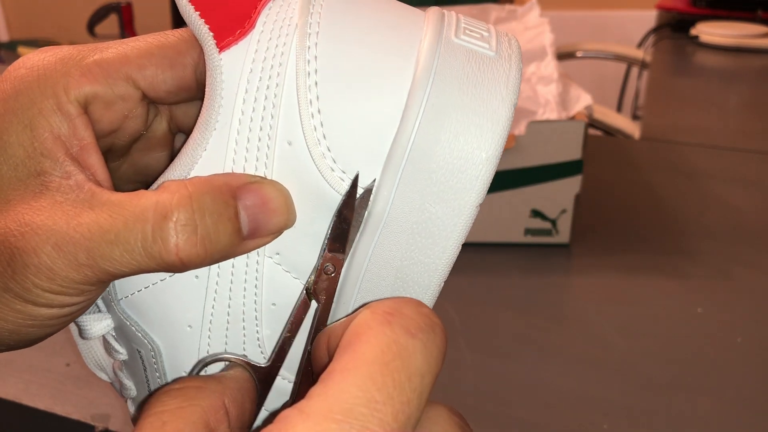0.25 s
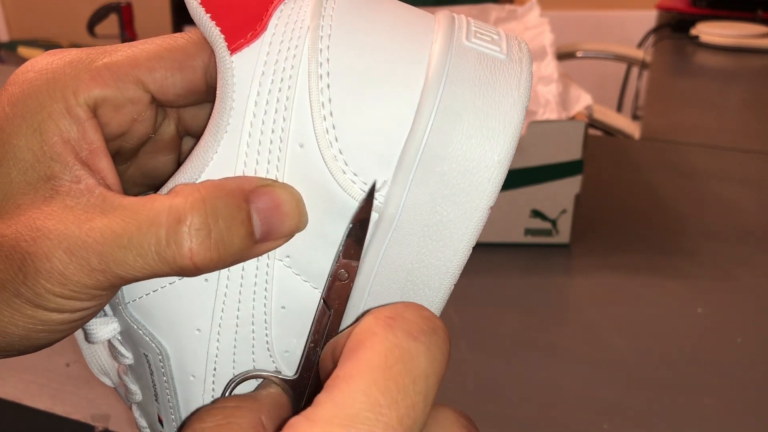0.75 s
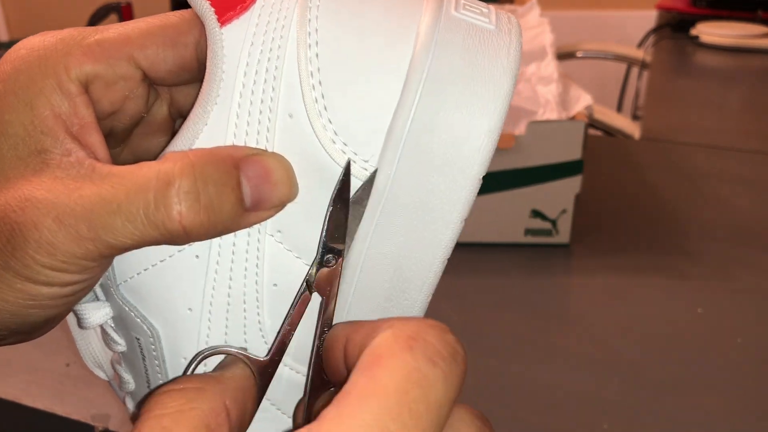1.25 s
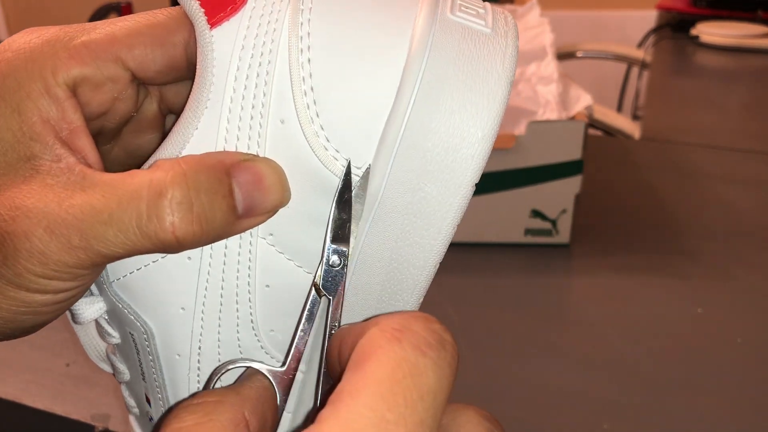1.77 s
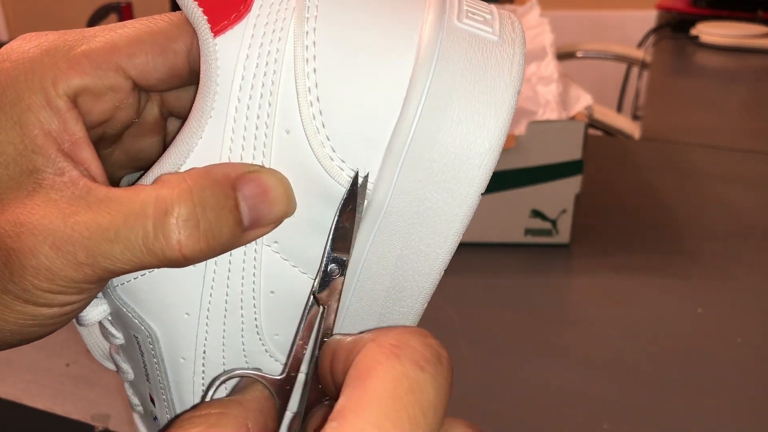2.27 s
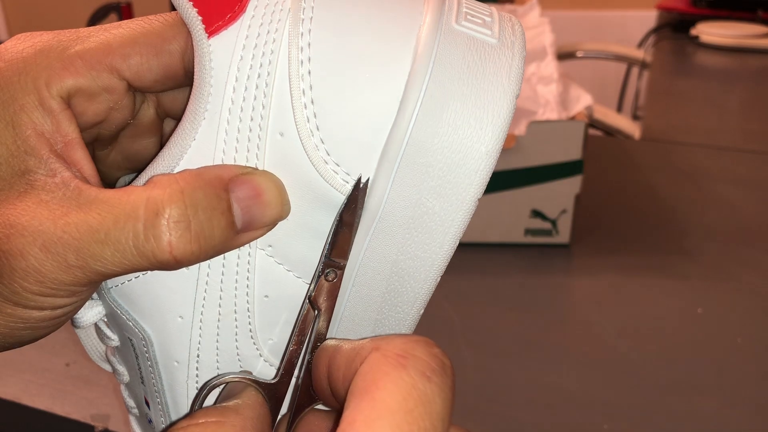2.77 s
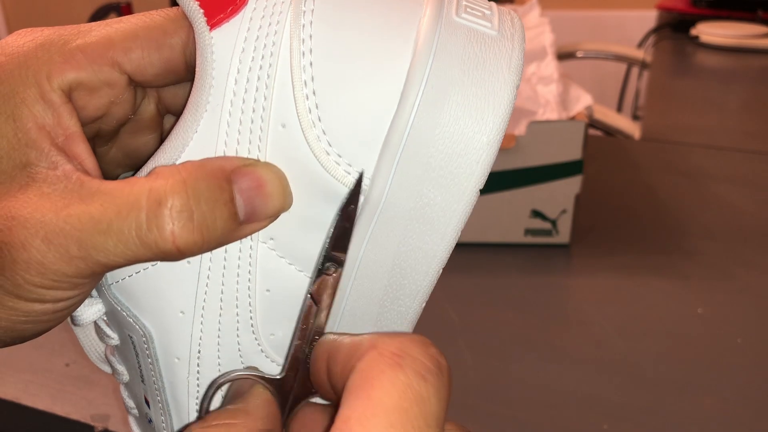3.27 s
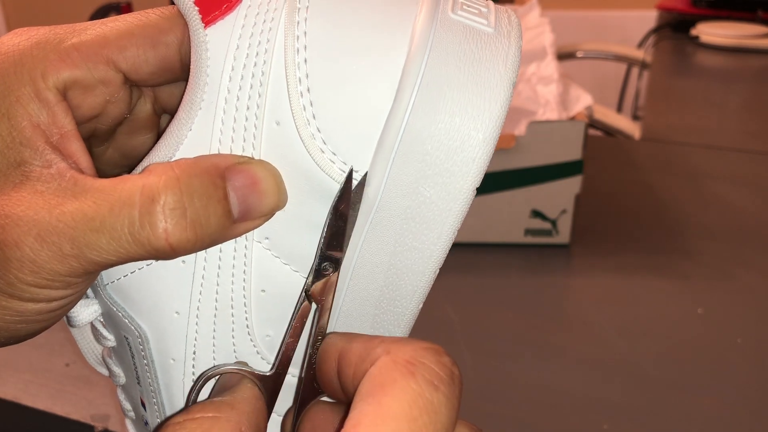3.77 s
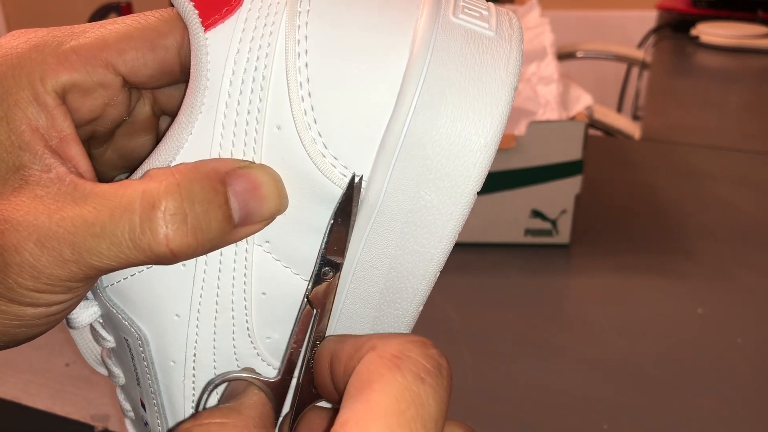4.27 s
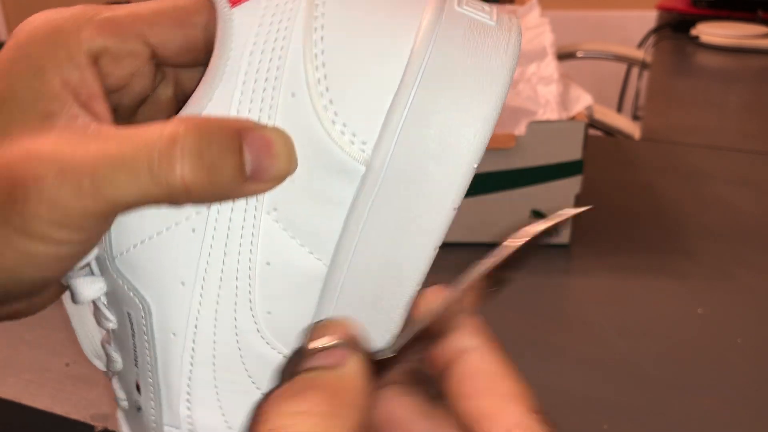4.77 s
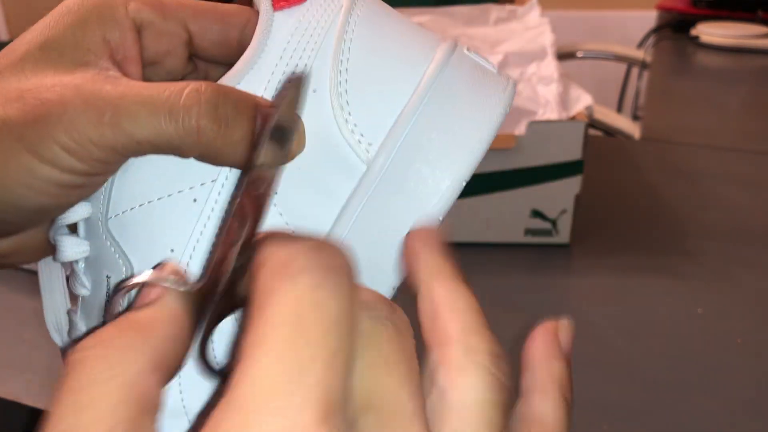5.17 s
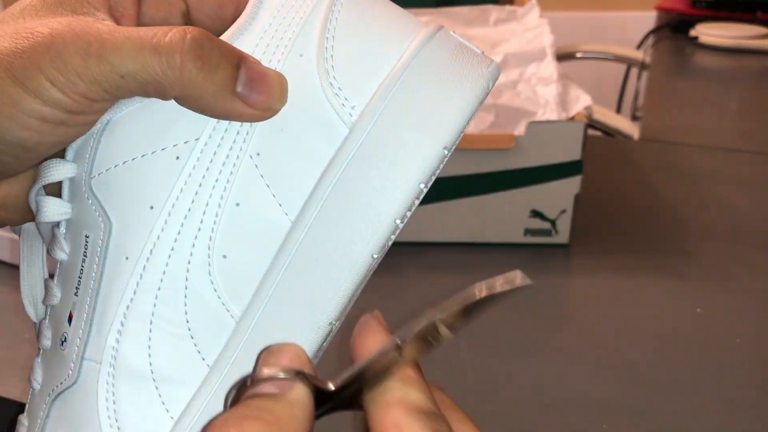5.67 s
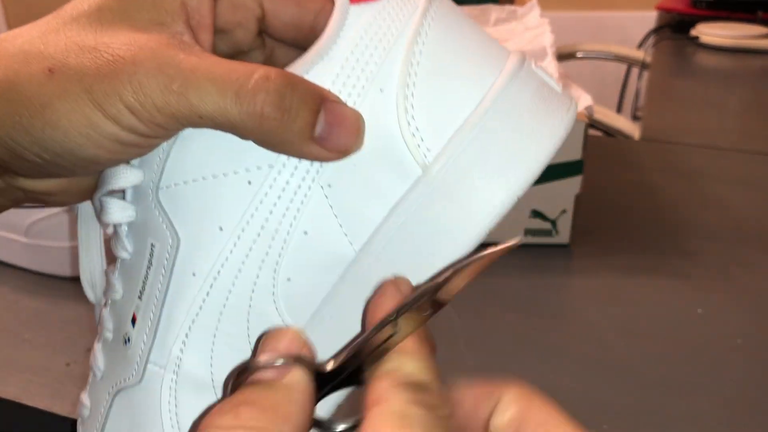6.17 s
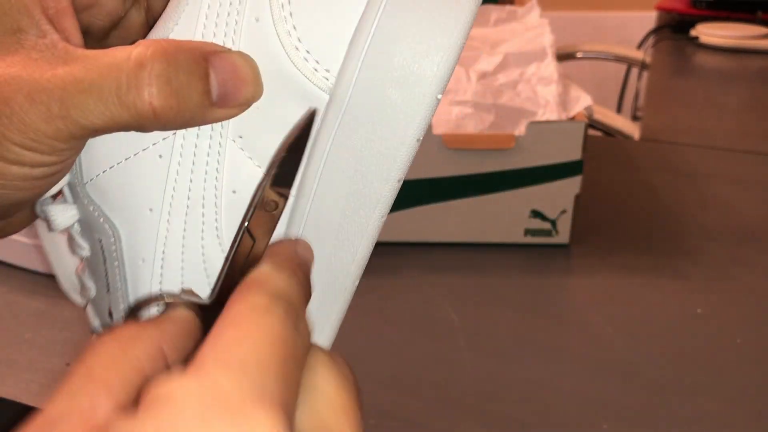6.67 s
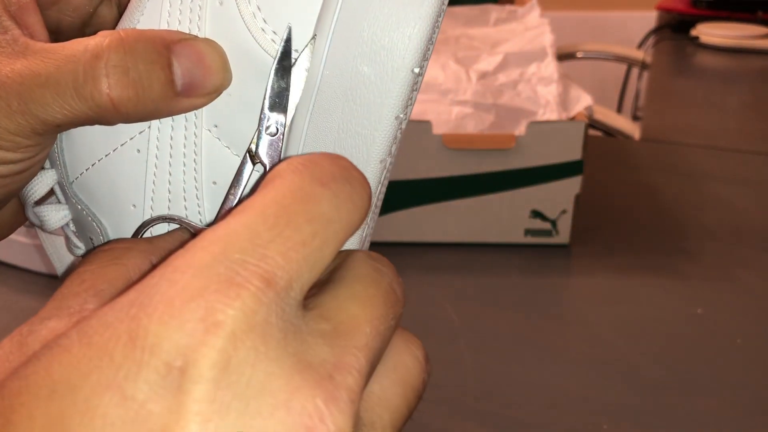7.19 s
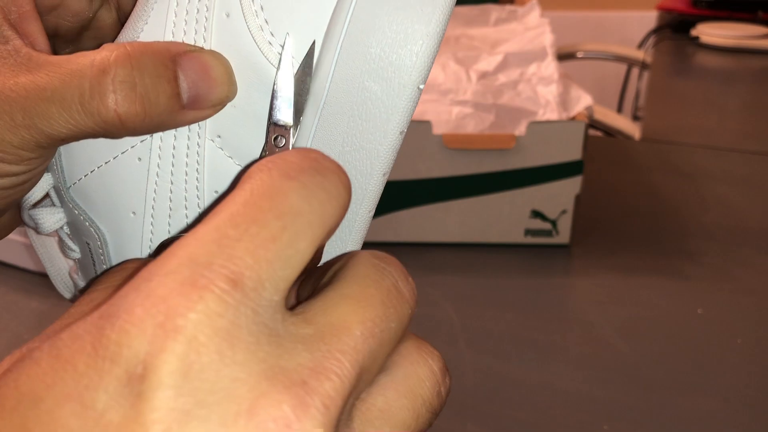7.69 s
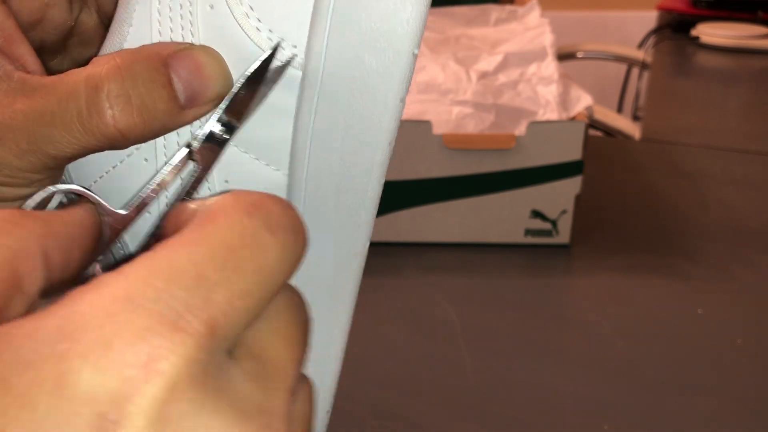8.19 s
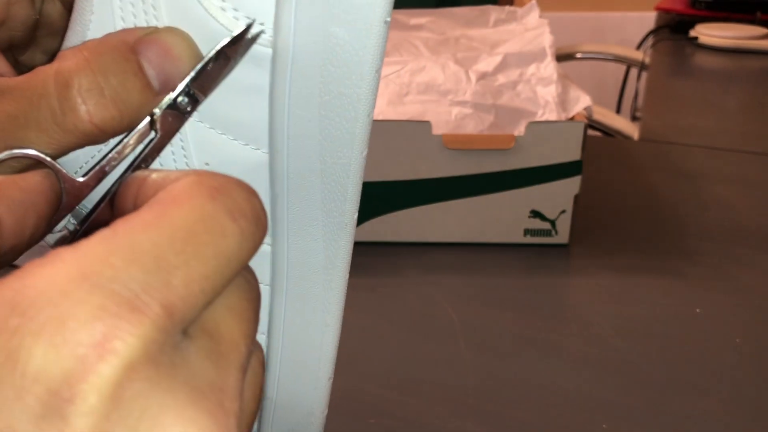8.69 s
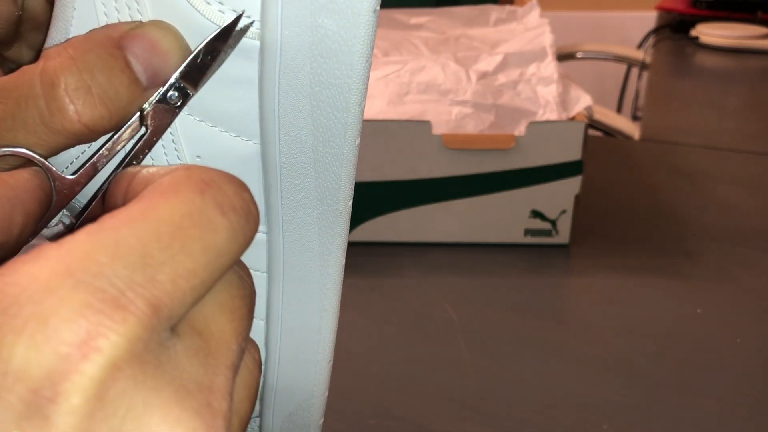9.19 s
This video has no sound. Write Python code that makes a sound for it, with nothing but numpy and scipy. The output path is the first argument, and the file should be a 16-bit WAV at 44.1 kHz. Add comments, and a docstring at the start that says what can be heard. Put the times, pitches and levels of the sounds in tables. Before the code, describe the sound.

Three dry scissor snips, followed by light metal clacks, ticks and finger flicks on a leather shoe, close up in a quietly humming room.

```python
"""Small steel scissors snip three loose threads on a sneaker, close by, over a quiet motor hum.
Each cut is a dry crack that rings the blades and knocks the shoe. Then the blades clack shut, scissors or
a finger tick against the shoe, and fingers flick the ends off three times, each a tap and a rasping slide.
Past the middle the hum swells in the bass and a thin hiss joins the air of the room."""
import sys
import numpy as np
from scipy import signal
from scipy.fft import rfft, irfft
from scipy.io import wavfile
from scipy.ndimage import uniform_filter1d

SR = 44100
rng = np.random.default_rng(int(sys.argv[2]) if len(sys.argv) > 2 else 0)


def wav_out(sig):
    """Save sig, one row per channel (or a flat mono array), as 16-bit PCM at SR to the path in sys.argv[1]."""
    wavfile.write(sys.argv[1], SR, np.round(np.clip(np.atleast_2d(sig).T, -1, 1) * 32767).astype(np.int16))


N = 416304
TIME = np.arange(N) / SR

# thread cuts: start_s, level_db, crack_hz, knock_edge_hz
SNIPS = [(0.7238, -3.5, 8300, 1820), (3.1581, -6, 5640, 5000), (4.4666, -9.5, 5950, 4500)]
# blades damped by thread: pitch_hz, width_hz, gain_db
CUT_MODES = [(5750, 410, 0), (6450, 1000, 0), (7400, 360, -1), (8600, 250, -8), (8900, 340, -11),
             (9800, 3800, -5), (12100, 470, 0), (14440, 250, 8), (14950, 450, -2)]
# tearing fibres: freq_hz, density_db
TEAR_SPECTRUM = [(300, -5), (700, 4), (1800, 13), (3000, -18), (5500, 7), (9000, 7), (12000, 0),
                 (16000, -8)]

def snips():
    """The blades part a thread with a crack, then the last fibres tear."""
    ring_db, knock_db = -3.5, 1.5
    hits = [(s, db, hz, db + ring_db, db + knock_db, edge_hz) for s, db, hz, edge_hz in SNIPS]
    cuts = blade_hits(hits, CUT_MODES, ring_bounce_s=.0002, crack_width_hz=7400)
    return cuts + dying_noise(SNIPS, TEAR_SPECTRUM, gain_db=-28.5, t60_s=.016)


# steel meets steel: start_s, level_db, crack_hz
CLACKS = [(4.8616, -26, 5500), (4.868, -30, 9100), (4.9994, -37, 7500), (6.2595, -22.5, 5500),
          (6.2842, -12, 11500), (6.5555, -33, 8000)]
# bare blades: pitch_hz, width_hz, gain_db
BLADE_MODES = [(2430, 260, -4.5), (6320, 78, 5.5), (7500, 460, -11), (9000, 170, 6), (9140, 150, -9),
               (11700, 480, -10), (14200, 820, -15), (15400, 650, -4)]
# loose blades: freq_hz, density_db
CHATTER_SPECTRUM = [(1000, -20), (2500, 1), (5000, 0), (9000, 0), (12000, -1), (16000, -4)]

def clacks():
    """Bare blades shut and chatter; a harder clack rings far more and knocks only a little more."""
    hits = []
    for s, db, crack_hz in CLACKS:
        ring_db = 20.7 + 1.74 * db
        knock_db, knock_edge_hz = -9.5 + .51 * db, 9400
        hits.append((s, db, crack_hz, ring_db, knock_db, knock_edge_hz))
    shuts = blade_hits(hits, BLADE_MODES, ring_bounce_s=.00018, crack_width_hz=8300)
    return shuts + dying_noise(CLACKS, CHATTER_SPECTRUM, gain_db=-33, t60_s=.038)


# shoe under the tips: pitch_hz, width_hz, gain_db
KNOCK_MODES = [(630, 280, -1.5), (1140, 2200, -11.5), (1710, 140, 1.5), (2510, 260, 1), (3140, 160, -3),
               (4050, 770, -5)]

def blade_hits(hits, steel_modes, ring_bounce_s, crack_width_hz):
    """One jolt makes a broad crack, rings the steel and knocks the shoe that the tips rest on."""
    cracks, steel, shoe = np.zeros((3, N))
    for s, crack_db, crack_hz, ring_db, knock_db, knock_edge_hz in hits:
        edge_hz = 2.04 * crack_hz   # a slower break is duller
        jolt = low_pass(signal.unit_impulse(N, round(s * SR)), edge_hz)
        cracks += resonate(jolt, [(crack_hz, crack_width_hz, crack_db)])
        steel += contacts([(s, ring_db, edge_hz)], bounce_s=ring_bounce_s)
        shoe += contacts([(s, knock_db, knock_edge_hz)], bounce_s=.00025)
    return cracks + resonate(steel, steel_modes) + resonate(shoe, KNOCK_MODES)


# light contacts with the shoe: start_s, level_db, edge_hz
SHOE_TICKS = [(5.059, -8, 7000), (5.6643, 0.5, 4500), (5.9955, -4, 4500), (6.6995, -10.5, 9000),
              (6.7763, 1, 2600), (7.0026, -8, 5000), (7.1338, -2.5, 2700), (8.2265, -3.5, 3000)]
# rubber sole: pitch_hz, width_hz, gain_db
SOLE_MODES = [(1130, 270, -22), (1980, 330, -14.5), (2500, 280, -12.5), (3830, 490, -15), (6750, 1500, -21)]

def shoe_ticks():
    """Scissors or a finger tick lightly against the shoe."""
    return resonate(contacts(SHOE_TICKS, bounce_s=.0005, order=4), SOLE_MODES)


# fingertip flicks: start_s, tap_db, slide_db, time_to_peak_s, lift_s
FLICKS = [(5.0693, -5, -40.5, 0.072, 0.008), (5.3726, -6.5, -41.5, 0.055, 0.038),
          (5.9824, -7, -39.5, 0.054, 0.013)]
# leather upper: pitch_hz, width_hz, gain_db
LEATHER_MODES = [(266, 41, 1), (597, 44, 7), (800, 160, -2), (1105, 150, 1), (1670, 260, -5.5),
                 (2530, 600, -9), (4100, 900, -11), (5700, 900, -11.5), (8300, 1300, -11.5),
                 (13100, 2900, -19), (137, 27, 11)]

def taps(edge_hz=12000):
    """A fingertip lands on the leather at the start of each flick."""
    landings = [(s, tap_db, edge_hz) for s, tap_db, *_ in FLICKS]
    return resonate(contacts(landings, bounce_s=.0004, direct=.88), LEATHER_MODES)


# light skin strokes: peak_s, level_db, relative_hiss_db, rise_s, fall_s
BRUSHES = [(2.32, -64.5, -12, .06, .06), (2.68, -66.5, -13, 0.037, .06), (5.54, -66.5, -4.5, 0.17, 0.2),
           (6.07, -60.5, -10, 0.025, 0.37), (6.52, -54.5, -10, 0.087, 0.023),
           (6.59, -66.5, -1, 0.085, 0.15)]
# dull and bright parts of friction: freq_hz, density_db
RUB_BODY_SPECTRUM = [(150, -2.5), (500, 3.5), (1200, 0.5), (1750, -4.5), (2500, -2.5), (3400, -7),
                     (6000, -18.5), (15000, -50)]
RUB_HISS_SPECTRUM = [(1500, -15), (4000, 0), (7500, 2.5), (10500, -1.5), (12500, -4), (15300, -11),
                     (16300, -34)]
# leather under slipping skin: pitch_hz, width_hz, gain_db
RASP_MODES = [(1110, 230, -4), (2550, 550, -3)]

def swipes(rest_s=.0085, grain_db=3.0, slips_per_s=1300):
    """Skin rubs grainy leather: with speed comes hiss, then body, then in flicks a stick-slip rasp."""
    body, hiss, rasp = np.zeros((3, N))
    for s, _, db, time_to_peak_s, lift_s in FLICKS:
        speed = stroke(s + time_to_peak_s, time_to_peak_s - rest_s, lift_s)
        body += amp(db - 1.8) * speed ** 1.96
        hiss += amp(db - 7.5) * speed ** 1.3
        rasp += amp(db - 6.5) * speed ** 3.6
    for peak_s, db, hiss_db, rise_s, fall_s in BRUSHES:
        friction = amp(db) * stroke(peak_s, rise_s, fall_s) ** 1.46
        body += friction
        hiss += amp(hiss_db) * friction
    grain = rms_one(amp(grain_db * drift(rate_hz=570)))
    slips = (rng.random(N) < slips_per_s / SR) * rng.standard_normal(N)
    rubbing = body * noise(RUB_BODY_SPECTRUM) + hiss * noise(RUB_HISS_SPECTRUM)
    return grain * rubbing + rasp * rms_one(resonate(slips, RASP_MODES))


# nail catch: start_s, level_db, length_s
NAIL_ZIP = [(6.04, -38.5, 0.005)]
# nail on sole: pitch_hz, width_hz, gain_db
NAIL_MODES = [(2600, 510, 3), (5300, 540, -6), (7100, 500, -0.5), (8000, 410, 2.5), (9400, 1200, -6)]

def nail_zip():
    """A nail zips off the ribbed sole."""
    pressure = sum(amp(db) * ((TIME > s) & (TIME < s + length_s)) for s, db, length_s in NAIL_ZIP)
    return uniform_filter1d(pressure, size=40) * resonant_noise(NAIL_MODES)


# grip shifts: peak_s, level_db, half_width_s
GRIPS = [(6.515, -59.5, 0.048), (7.163, -50.5, 0.01), (7.95, -52, 0.02)]
# shoe cavity: pitch_hz, width_hz, gain_db
HOLLOW_MODES = [(264, 61, 2), (564, 120, 5)]

def grip():
    """The hand shifts its hold: soft thuds in the hollow shoe."""
    pressure = sum(amp(db) * bump(s, half_width_s) for s, db, half_width_s in GRIPS)
    return pressure * resonant_noise(HOLLOW_MODES)


def reflections(sound, build_s=.004, t60_s=.26, edge_hz=3800, gain_db=-17):
    """Echoes build up from the table and walls, then die away."""
    t = TIME[:SR // 2]
    scatter = low_pass(rng.standard_normal(len(t)), edge_hz, order=1)
    tail = scatter * amp(-60 * t / t60_s) * (1 - np.exp(-t / build_s))
    return amp(gain_db) * signal.fftconvolve(sound, tail / np.linalg.norm(tail))[:N]


# steady motor orders: speed_multiple, rms_db
MOTOR_ORDERS = [(1, -81), (3, -59), (4, -58.5), (5, -65.5), (7, -73), (9, -71), (16, -83.5)]
# dips of the sixth order: centre_s, depth_db, half_width_s
NOTE_DIPS = [(0.05, 2.5, 0.4), (3.8, 3.5, 0.31), (4.85, 7.5, 0.55)]

def motor_hum(turns_hz=26.94, wander=.00455):
    """Orders of a running motor: the sixth is the main note, the second swells to a boom."""
    speed_hz = turns_hz * (1 + wander * drift(rate_hz=2.05))
    steady = sum(tone(multiple * speed_hz, db, waver_db=2.0) for multiple, db in MOTOR_ORDERS)
    boom_db = -65 + 15.5 * ramp(start_s=4.9, rise_s=1.7)
    note_db = -51.5 - sum(depth_db * bump(s, half_width_s) for s, depth_db, half_width_s in NOTE_DIPS)
    boom = tone(2 * speed_hz, boom_db, waver_db=.5)
    note = tone(6 * speed_hz, note_db, waver_db=1.0)
    return steady + boom + note


# mains harmonics: pitch_hz, rms_db
MAINS = [(60, -71), (120, -66.5), (180, -65), (240, -76)]

def drone_and_mains():
    """A deep drone and mains hum, each line wavering on its own."""
    drone = tone(hz=90.04, db=-61.5, waver_db=3.5)
    return drone + sum(tone(hz, db, waver_db=3.5) for hz, db in MAINS)


# still room air: freq_hz, density_db
AIR_SPECTRUM = [(20, -22), (42, -12), (65, -6), (110, -5.5), (150, 6.5), (205, 0), (320, 1.5), (580, -6),
                (780, -12.5), (1050, -16), (1300, -19.5), (6000, -25), (10000, -28), (16000, -38)]
# motor whirr and thin hiss: pitch_hz, width_hz, gain_db
WHIRR_MODES = [(895.6, 30, -2.5), (1594, 124, -14.5), (2700, 90, -15.5), (3930, 110, -19.5)]
THIN_HISS_MODES = [(5780, 370, 0)]

def air():
    """Broad rumble and hiss with the motor's narrow whirr; a thin hiss fades in and stays."""
    whirr = amp(-72) * resonant_noise(WHIRR_MODES)
    thin_hiss = amp(-78.5) * ramp(start_s=4.2, rise_s=1.4) * resonant_noise(THIN_HISS_MODES)
    return amp(-55) * noise(AIR_SPECTRUM) + whirr + thin_hiss


def contacts(hits, bounce_s, direct=.8, order=2):
    """Each sharp push spreads over five bounces inside the object; soft ones lack treble."""
    size = 4096
    force = np.zeros(N + size)
    for s, db, edge_hz in hits:
        push = signal.unit_impulse(size)
        for lag in 1 + (rng.random(5) * bounce_s * SR).astype(int):
            path = np.r_[direct, np.zeros(lag), 1]
            push = signal.lfilter(path, path[::-1], push)   # all-pass: smears time, keeps colour
        at = round(s * SR)
        force[at:at + size] += amp(db) * low_pass(push, edge_hz, order)
    return force[:N]


def resonate(force, modes):
    """Parallel resonances with alternating signs."""
    out = np.zeros(N)
    for k, (hz, width_hz, db) in enumerate(modes):
        radius = np.exp(-np.pi * width_hz / SR)
        poles = [1, -2 * radius * np.cos(2 * np.pi * hz / SR), radius ** 2]
        gain = (-1) ** k * amp(db) * (1 - radius ** 2) / 2
        out += gain * signal.lfilter([1, 0, -1], poles, force + 1e-18)
    return out


def dying_noise(hits, spectrum, gain_db, t60_s):
    """A decaying burst behind each hit, gain_db relative to it."""
    envelope = np.zeros(N)
    for s, db, *_ in hits:
        decay_db = 60 * np.maximum(TIME - s, 0) / t60_s
        envelope += amp(db + gain_db - decay_db) * (TIME >= s)
    return envelope * noise(spectrum)


def tone(hz, db, waver_db):
    """A hum line whose level wavers."""
    phase = 2 * np.pi * (np.cumsum(hz * np.ones(N)) / SR + rng.random())
    return np.sqrt(2) * amp(db + waver_db * drift(rate_hz=2.0)) * np.sin(phase)


def resonant_noise(modes):
    """White noise through resonances; rms 1."""
    return rms_one(resonate(rng.standard_normal(N), modes))


def noise(spectrum):
    """Steady noise of the given spectral shape; rms 1."""
    hz, db = np.transpose(spectrum)
    bins_hz = np.maximum(np.arange(N // 2 + 1) * SR / N, 1)
    gain = amp(np.interp(np.log(bins_hz), np.log(hz), db))
    return rms_one(irfft(rfft(rng.standard_normal(N)) * gain, N))


def drift(rate_hz):
    """Smooth random motion; rms 1."""
    bins_hz = np.arange(N // 2 + 1) * SR / N
    return rms_one(irfft(rfft(rng.standard_normal(N)) / (1 + (bins_hz / rate_hz) ** 2), N))


def stroke(peak_s, rise_s, fall_s):
    """Finger speed: up to 1 and back to rest."""
    return np.interp(TIME, [peak_s - rise_s, peak_s, peak_s + fall_s], [0, 1, 0])


def bump(peak_s, half_width_s):
    """Bell curve of height 1."""
    return np.exp(-((TIME - peak_s) / half_width_s) ** 2)


def ramp(start_s, rise_s):
    """Linear rise from 0 to 1, then hold."""
    return np.clip((TIME - start_s) / rise_s, 0, 1)


def low_pass(x, edge_hz, order=2):
    """Dull everything above the edge."""
    return signal.sosfilt(signal.butter(order, min(edge_hz, .45 * SR), fs=SR, output="sos"), x)


def rms_one(x):
    """Scale to unit power."""
    return x / np.sqrt(np.mean(x ** 2) + 1e-20)


def amp(db):
    """Decibels to gain."""
    return 10 ** (np.asarray(db) / 20)


def scene():
    """Close handwork over the room's hum and air; mono."""
    scissors = snips() + clacks()
    handling = shoe_ticks() + taps() + swipes() + nail_zip() + grip()
    work = scissors + handling
    return (work + reflections(work) + motor_hum() + drone_and_mains() + air())[None]


def record(dry):
    """Steep cut of the top treble."""
    cutoff_hz = 16500
    return signal.sosfilt(signal.ellip(10, .1, 70, cutoff_hz, fs=SR, output="sos"), dry)


dry = scene()
out = record(dry)
wav_out(out)
```